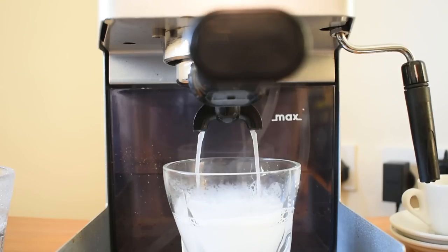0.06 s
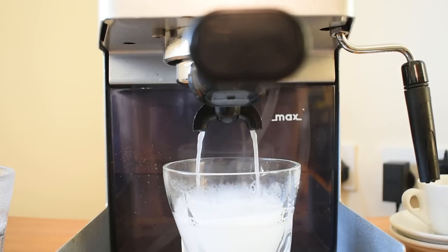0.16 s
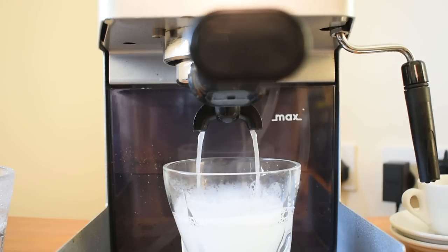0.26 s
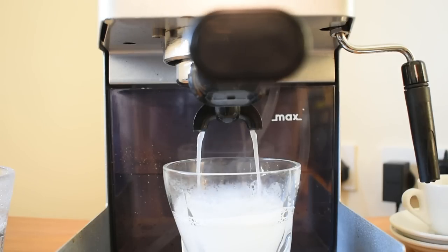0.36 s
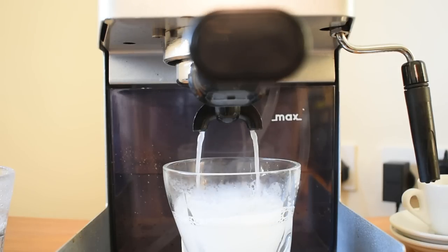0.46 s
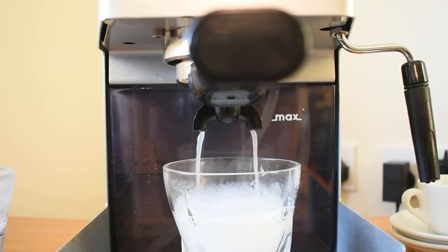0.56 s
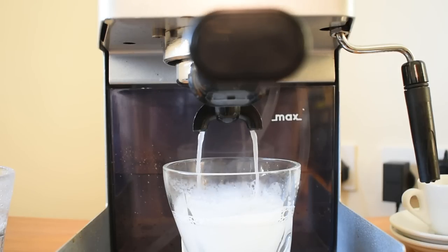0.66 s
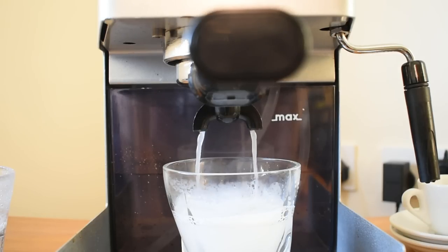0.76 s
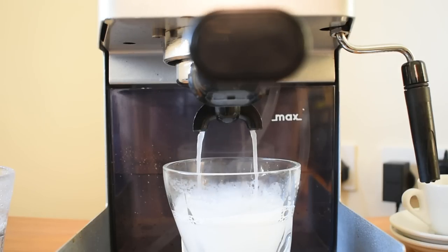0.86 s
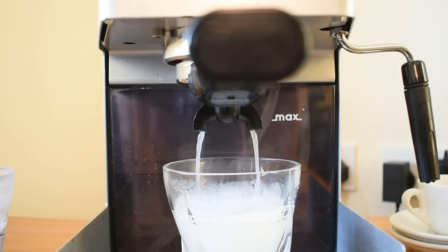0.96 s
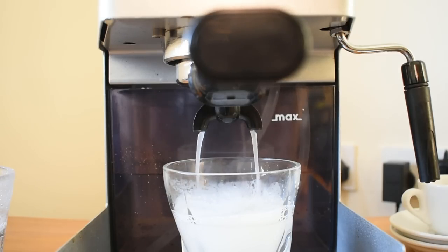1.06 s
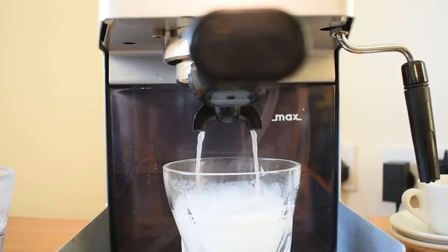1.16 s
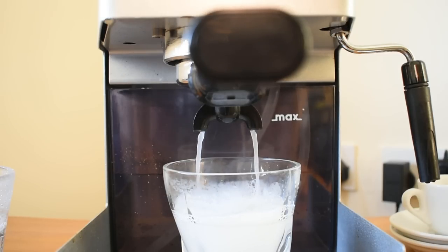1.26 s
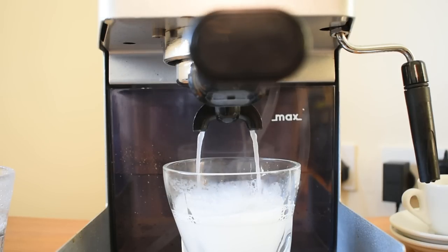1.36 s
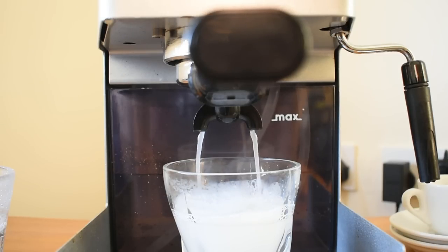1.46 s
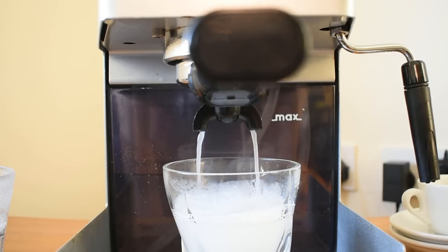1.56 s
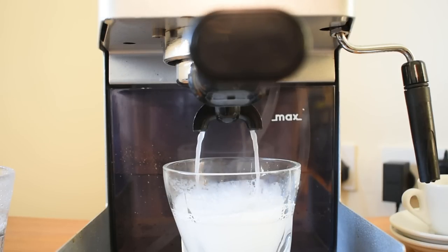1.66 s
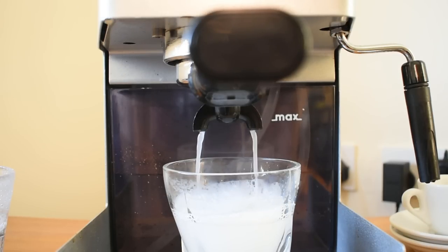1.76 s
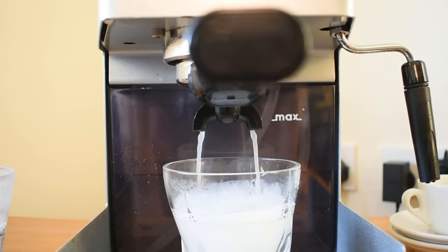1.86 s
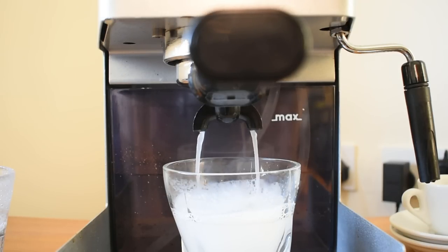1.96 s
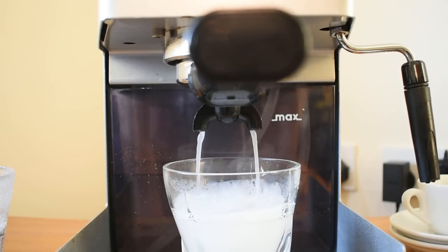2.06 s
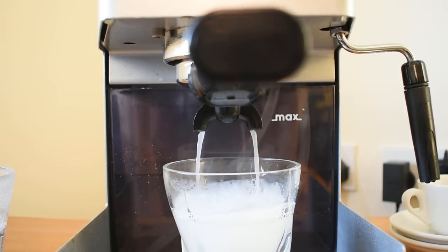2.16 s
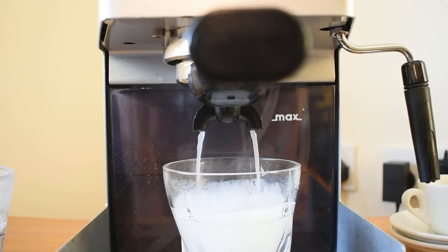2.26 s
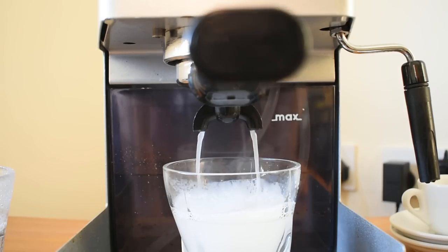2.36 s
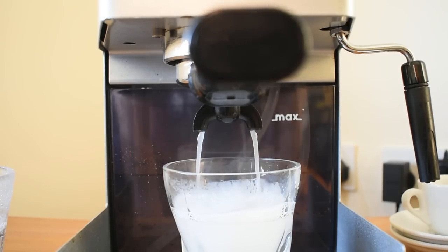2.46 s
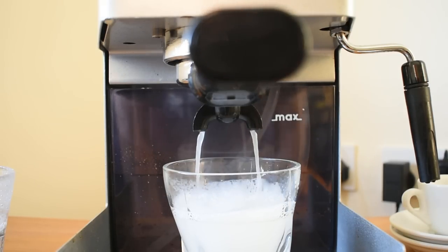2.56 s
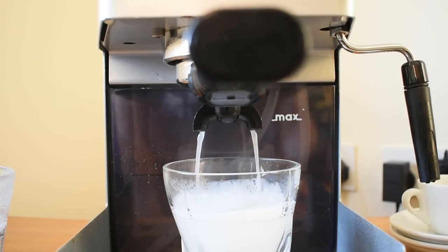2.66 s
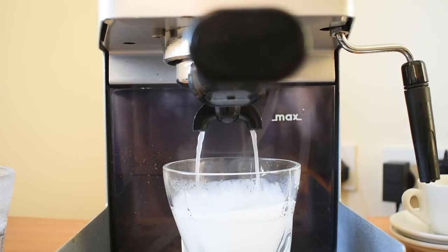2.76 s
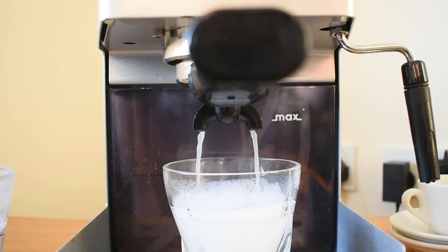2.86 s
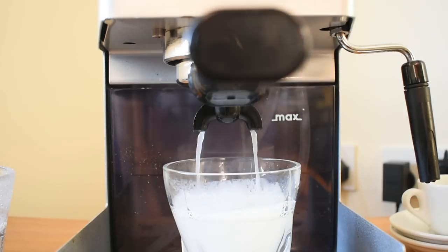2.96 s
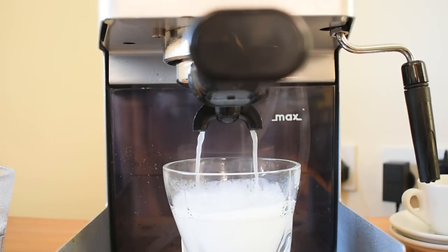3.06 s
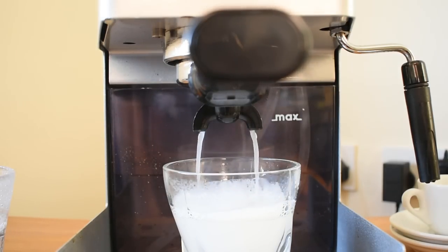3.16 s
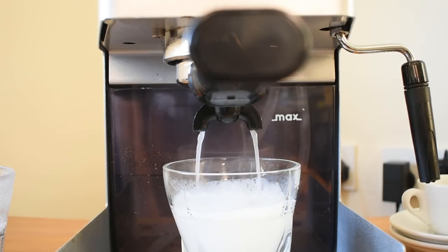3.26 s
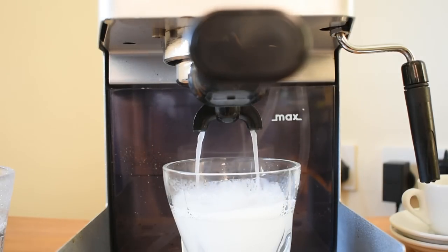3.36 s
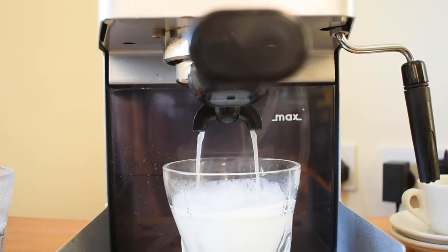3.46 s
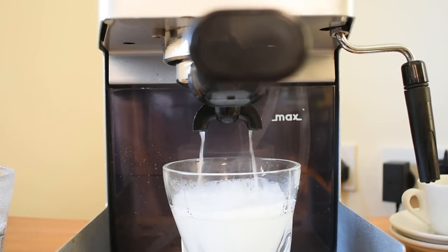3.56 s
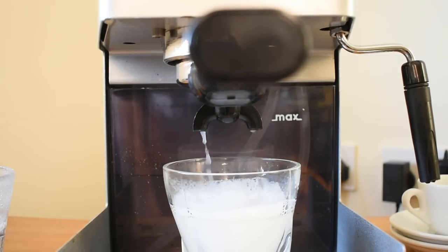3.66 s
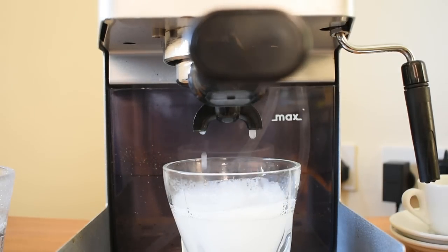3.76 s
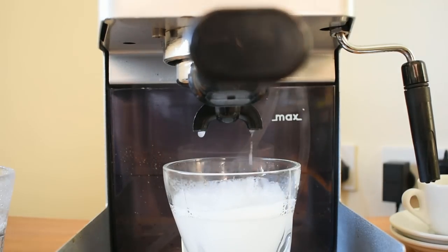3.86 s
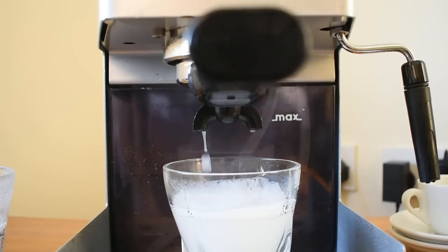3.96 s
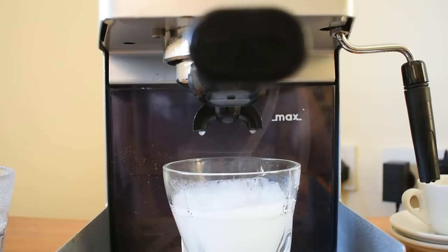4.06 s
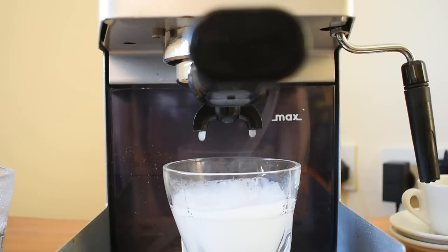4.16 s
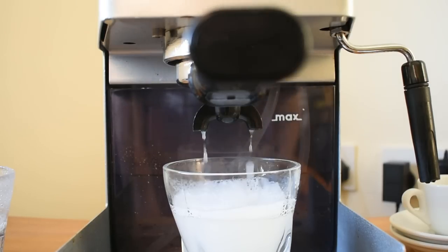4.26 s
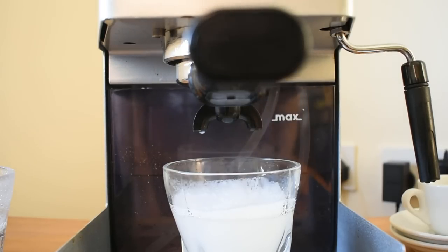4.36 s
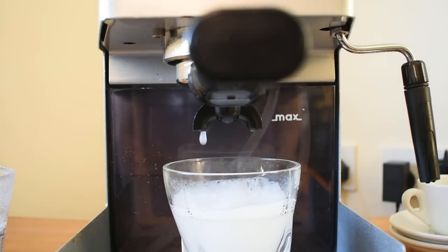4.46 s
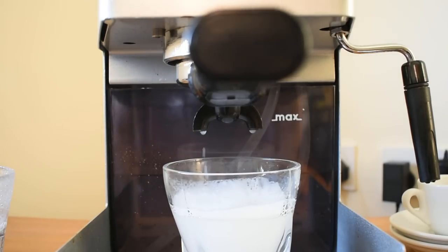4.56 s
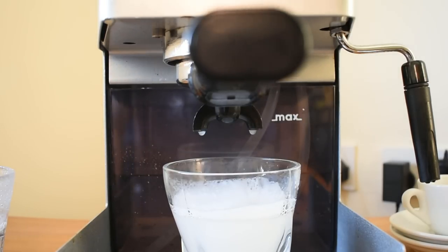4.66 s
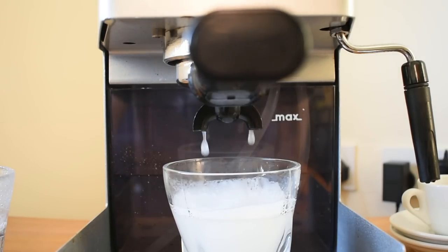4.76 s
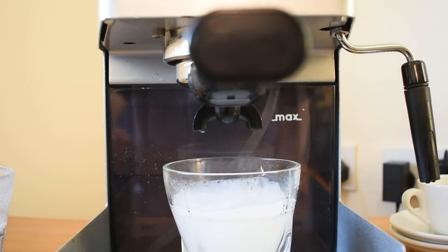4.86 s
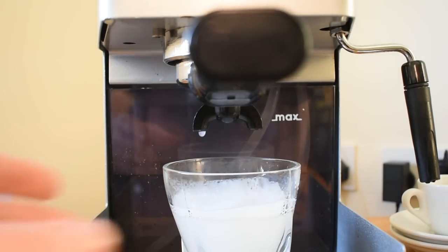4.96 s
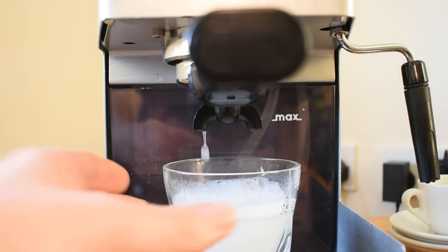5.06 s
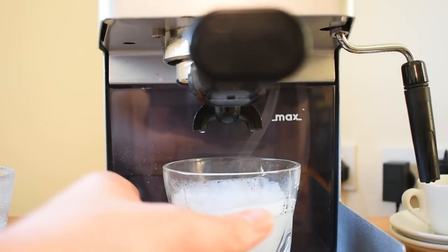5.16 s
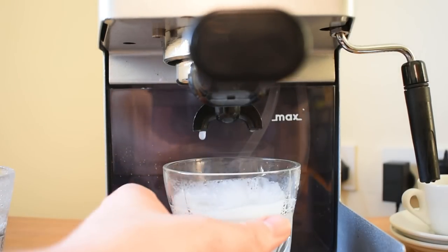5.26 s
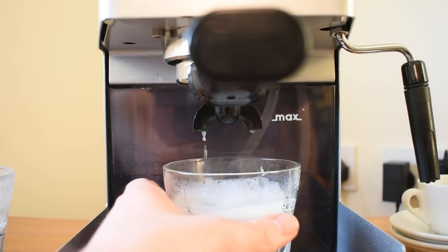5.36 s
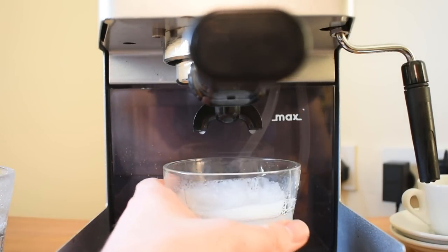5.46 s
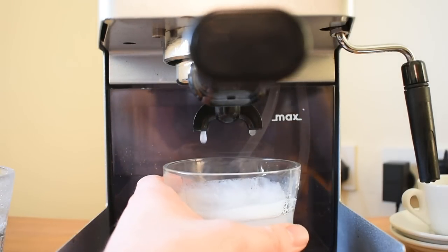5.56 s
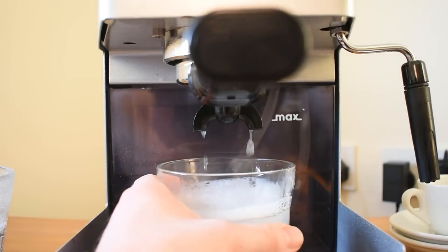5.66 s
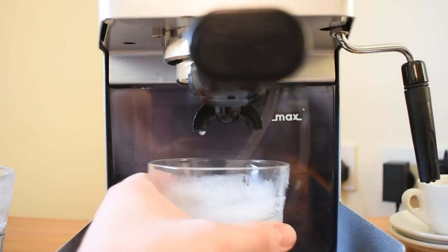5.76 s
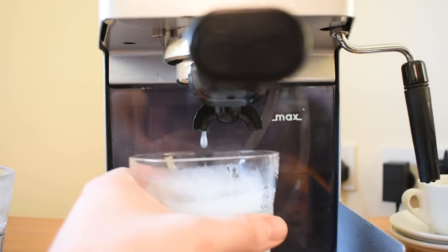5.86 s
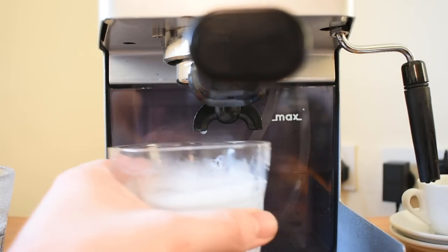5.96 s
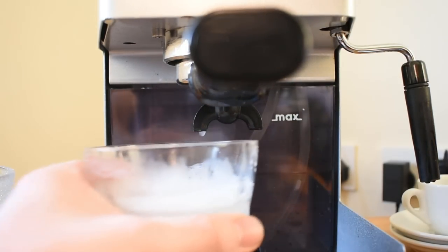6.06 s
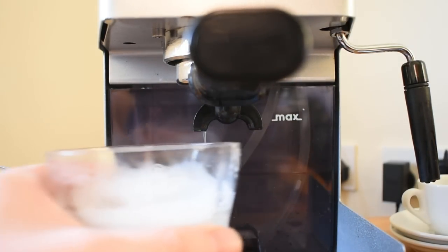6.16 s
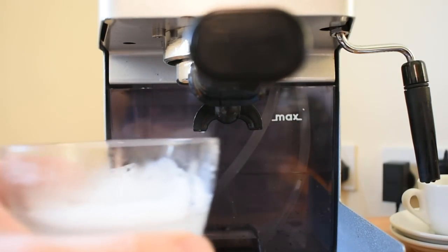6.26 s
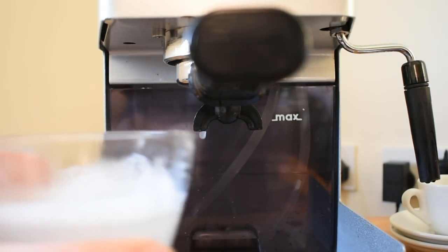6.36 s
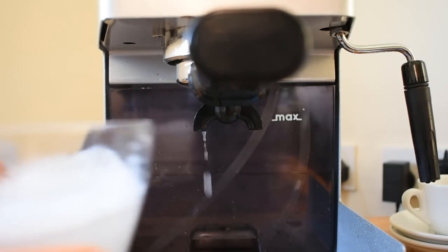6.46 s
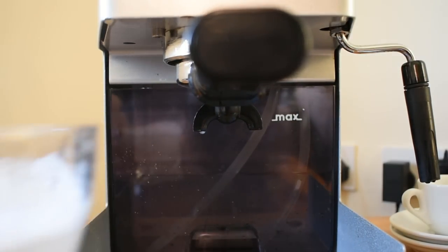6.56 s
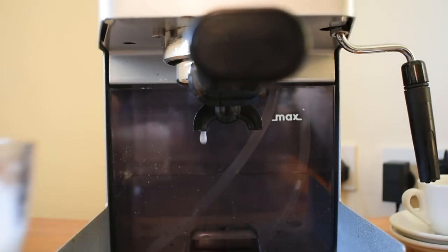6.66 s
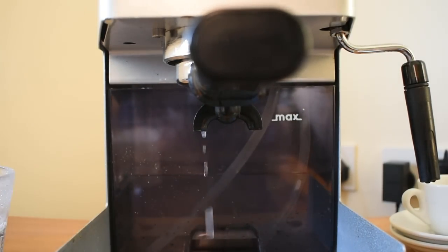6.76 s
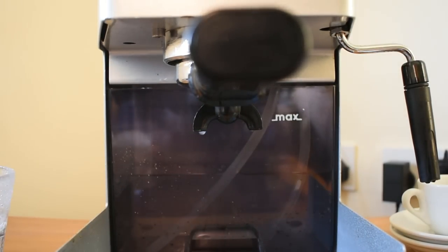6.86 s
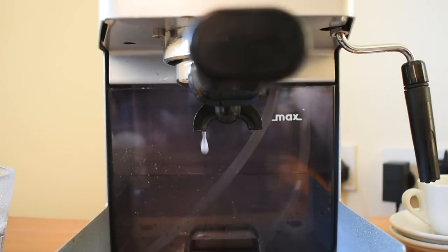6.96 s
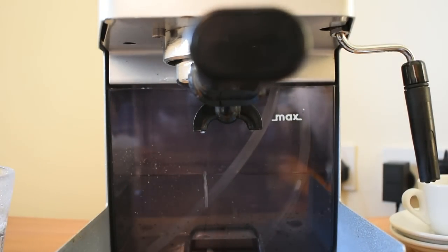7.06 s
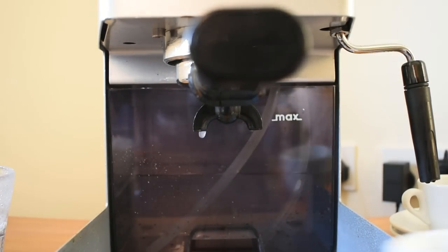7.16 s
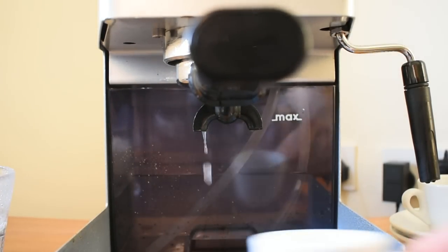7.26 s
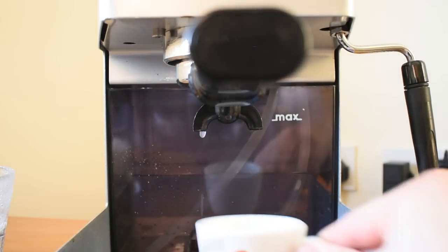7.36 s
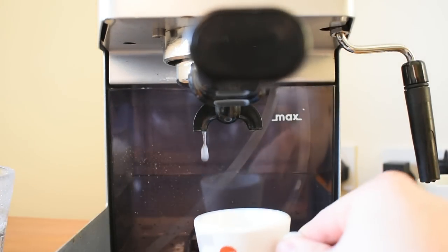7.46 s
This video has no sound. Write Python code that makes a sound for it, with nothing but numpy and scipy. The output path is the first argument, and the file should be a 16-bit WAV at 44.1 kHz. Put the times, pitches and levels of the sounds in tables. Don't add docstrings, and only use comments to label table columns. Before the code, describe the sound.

From 0 to 3.5 s a close espresso machine pump runs steadily: a coarse mains-rate buzz with metallic casing resonances, dense hiss pulsing at every stroke, fine rattling, and a low uneven gurgle of two jets in a tall glass. At about 3.5 s the flow stops and a very loud, bright switch snap cracks in several rapid contacts, slightly overloaded, with panel ringing and a half-second kitchen echo. Then it is quiet: soft room air, faint fridge hum, tiny foam fizz slowly fading. A small brush ticks at 4.5 s. Around 5.5 to 5.8 s the glass tips and drags off the metal tray with dull knocks; faint handling rubs follow at 6.2 to 6.3 s. Near 7.0 s it is set down, chattering quickly to rest with bright scrapes until 7.1 s. At 7.46 to 7.5 s a small cup chinks lightly and slides in.

```python
import sys
import numpy as np
from scipy import signal
from scipy.io import wavfile

SR = 44100
rng = np.random.default_rng(int(sys.argv[2]) if len(sys.argv) > 2 else 0)


def bounce(signal):
    frames = np.transpose(np.atleast_2d(signal))
    limited = np.clip(frames, -1, 1)
    pcm = np.round(limited * 32767).astype(np.int16)
    wavfile.write(sys.argv[1], SR, pcm)


def undo_db(level):
    steps = np.asarray(level, float) / 20
    return 10 ** steps


N = 331191

MAINS_HZ = 49.91
FIRST_STROKE_S, STOP_S = .0130, 3.497
HUM_T60_S, SETTLE_T60_S = 0.4, .32
FLOW_DB, RATTLE_DB, GURGLE_DB, AIR_DB = -31.5, -55, -34.5, -55.2
FOAM_DB, FOAM_FADE_DB_PER_S = -67, 2.2
CHATTER_S, CHATTER_GAP_S, CHATTER_DB, CHATTER_LOSS_DB = 7.0367, .00906, -32.5, 1.9

# order [multiple of mains], level_db [dB rms]
HUM_ORDERS = [(1, -53), (2, -47.5), (3, -48), (4, -39.5), (6, -39), (9, -51), (10, -48), (12, -51),
              (13, -53), (14, -52), (19, -52), (21, -58), (22, -52), (24, -51), (26, -55), (27, -41),
              (29, -48), (31, -58), (41, -60), (50, -59), (51, -60)]
# freq_hz [Hz], level_db [dB rms]
WEAK_ORDERS = [(600, -62), (1500, -66.5), (2500, -63.5), (3500, -64.5), (5300, -66.5)]
# freq_hz [Hz], density_db [dB per Hz]
FLOW_SPECTRUM = [(55, -28.5), (90, -12), (170, -8.5), (500, -10.5), (800, -13), (1500, -16.5),
                 (2500, -16.5), (2750, -19.5), (3300, -16.5), (3500, -17.5), (5500, -15), (9000, -11),
                 (12000, -14), (16000, -18.5)]
# freq_hz [Hz], width_hz [Hz], level_db [dB]
CASING_PEAKS = [(400, 40, 5.6), (613, 31, 7), (723, 30, 6), (954, 60, 8), (1120, 18, 2.4), (1224, 38, 3.8),
                (1372.4, 27, 15.7), (1500, 30, 9.6), (1854, 62, 4.7), (2220, 150, 5), (3750, 60, 5),
                (4880, 87, 2)]
# freq_hz [Hz], width_hz [Hz], level_db [dB]
VALVE_PEAKS = [(3580, 100, -3), (4130, 110, -4.5), (5170, 92, -8), (5740, 82, -3), (6290, 110, -1),
               (7060, 110, -1.5), (7710, 160, -4), (8840, 54, -2.5), (9220, 100, -2.5), (9740, 96, -10.5),
               (10030, 110, -8.5), (13100, 130, -5.5), (13900, 110, -3.5), (14700, 56, -10.5)]
# freq_hz [Hz], width_hz [Hz], level_db [dB]
GLASS_PEAKS = [(291.7, 27, -3.5), (313, 20, -2)]
# start_s [s], level_db [dB], t60_s [s], brightness_db [dB]
SWITCH_CONTACTS = [
    (3.5136, -11, .03, -3),
    (3.5152, -3.5, .016, 1),
    (3.5187, -8, .016, -9),
    (3.5217, -13, .025, -10),
    (3.524, -22, .1, -10),
]
# freq_hz [Hz], density_db [dB per Hz]
SWITCH_SPECTRUM = [(59, -46.5), (100, -17), (357, -10), (801, -12.5), (1280, -1.5), (1550, -7.5),
                   (2740, 5.5), (3320, -9.5), (4380, 0), (8100, -8), (9010, -10.5), (13200, -14.5),
                   (16000, -19.5)]
# freq_hz [Hz], level_db [dB], t60_s [s]
PANEL_MODES = [(160, -10.5, .3), (570, -6, .25), (1039, -2, 0.15), (1327, 1.5, .1), (1884, 7.5, 0.16),
               (2200, 0.5, 0.14), (2640, -3.5, .1), (2780, 0, .17), (4380, -6.5, 0.17)]
# freq_hz [Hz], t60_s [s]
ROOM_T60 = [(150, .5), (400, .46), (1000, .44), (2800, .44), (5000, .42), (8000, .33), (12000, .25)]
# freq_hz [Hz], level_db [dB rms]
FRIDGE_TONES = [(96.9, -72.5), (199.2, -66.5)]
# freq_hz [Hz], density_db [dB per Hz]
AIR_SPECTRUM = [(30, -19), (60, -8), (100, -7.5), (125, -13.5), (165, -10.5), (204, -6), (235, -14),
                (310, -10), (420, -15), (584, -16), (720, -12), (1280, -19.5), (6890, -30.3), (16000, -40)]
# freq_hz [Hz], density_db [dB per Hz]
FOAM_SPECTRUM = [(300, -22), (1000, -8), (3000, -1), (8000, -3), (16000, -11)]
# peak_s [s], level_db [dB], rise_s [s], fall_s [s]
SLEEVE_RUSTLES = [
    (4.492, -55, .07, .07),
    (4.4903, -46, .0004, .004),
    (5.53, -62, .03, .05),
    (5.72, -66, .15, .15),
    (6.17, -65, .03, .1),
    (7.5, -65, .3, .1),
]
# freq_hz [Hz], level_db [dB], t60_s [s]
TRAY_MODES = [(103, -6, 0.13), (298, 5, .09), (388, 3, .045), (520, -6, .04), (750, -10, 0.044),
              (950, -2, .04), (1550, -12, .04), (331, 4.5, .14)]
# freq_hz [Hz], density_db [dB per Hz]
GRIT_SPECTRUM = [(350, -36), (600, -10), (931, -1), (1440, -15), (2430, -12), (3390, -16), (4710, -23.5),
                 (6030, -21.5), (14100, -41), (16000, -45)]
# freq_hz [Hz], width_hz [Hz], level_db [dB]
BASE_PEAKS = [(1550, 86, 6), (2080, 55, 10), (2400, 150, -2), (3050, 150, 1), (4730, 180, 10),
              (5640, 200, 7)]
# start_s [s], level_db [dB]
TRAY_TAPS = [
    (5.548, -42),
    (5.765, -35),
    (6.9695, -34),
    (6.9749, -36),
    (6.990, -34.5),
    (7.4622, -45),
]
# peak_s [s], thud_db [dB], grit_db [dB], fall_s [s]
KNOCK_CONTACTS = [
    (4.4903, -75, -52, .003),
    (5.549, -55, -65, 0.018),
    (6.162, -70, -59.5, .006),
    (6.973, -62, -53, 0.0052),
    (7.022, -50, -49, .012),
    (7.0602, -48, -34, 0.0068),
    (7.462, -60, -56, .003),
]
# peak_s [s], thud_db [dB], grit_db [dB], fall_s [s]
RUB_CONTACTS = [
    (5.525, -65, -62, 0.019),
    (5.765, -57, -46, 0.016),
    (5.80, -56, -71, 0.016),
    (6.228, -62, -57, 0.024),
    (6.335, -70, -60, .022),
    (7.10, -62, -52, .022),
    (7.040, -50, -39, 0.011),
    (7.051, -47, -36, 0.0042),
    (7.509, -60, -47, 0.0092),
]
# centre_s [s], level_db [dB], width_s [s]
HAND_BUMPS = [
    (5.578, -48, .0025),
    (6.215, -45, .002),
    (6.247, -46, .002),
    (6.338, -46, .002),
    (7.068, -41, .002),
]
# freq_hz [Hz], level_db [dB], t60_s [s]
CUP_MODES = [(1230, 1, .06), (1290, -13, .04), (2280, -3, 0.034), (2608, -12, .03), (4930, -4, .02),
             (5300, -14, .04), (11200, -12, .02), (11600, -7, .02)]
# start_s [s], level_db [dB], lowest_mode_db [dB]
CUP_CLINKS = [
    (7.4615, -44, -16),
    (7.476, -51, -16),
    (7.499, -55, 3),
    (7.5025, -51, 6),
    (7.5058, -47, 6),
]


def evened(x):
    return x / np.sqrt(np.mean(x ** 2) + 1e-20)


def read(points, hz):
    f, value = np.transpose(points)
    return np.interp(np.log(hz + 1), np.log(f + 1), value)


def resonance(hz, peaks, lift_db=0.):
    return sum(undo_db(db + lift_db) ** 2 / (1 + (2 * (hz - f) / w) ** 2) for f, w, db in peaks)


def colour(x, spectrum, peaks=(), lift_db=0.):
    hz = abs(np.fft.fftfreq(8192, 1 / SR))
    power = 1 + resonance(hz, peaks, lift_db)
    log_gain = np.log(undo_db(np.maximum(read(spectrum, hz), -100)) * np.sqrt(power))
    taps = np.fft.ifft(np.exp(np.conj(signal.hilbert(log_gain)))).real[:4096]
    return signal.oaconvolve(x, taps / np.linalg.norm(taps))[:len(x)]


def ring(modes, seconds):
    t = np.arange(round(seconds * SR)) / SR
    return sum(undo_db(db - 60 * t / t60) * np.sin(2 * np.pi * hz * t) for hz, db, t60 in modes)


def wander(hz):
    sos = signal.butter(2, hz, fs=SR, output="sos")
    return evened(signal.sosfilt(sos, rng.standard_normal(N)))


def press(t, peak_s, rise_s, fall_s):
    return np.exp(-np.where(t < peak_s, (peak_s - t) / rise_s, (t - peak_s) / fall_s))


def room(x):
    taps = np.zeros(SR // 2)
    at = np.arange(200, len(taps) - 20, 20)
    taps[at + rng.integers(0, 20, len(at))] = rng.choice([-1., 1.], len(at))
    hz, t, z = signal.stft(taps, SR, nperseg=256)
    decay = undo_db(-60 * t / read(ROOM_T60, hz)[:, None])
    tail = signal.istft(z * decay, SR, nperseg=256)[1]
    return signal.oaconvolve(x, tail / np.linalg.norm(tail))[:N]


def kitchen(t):
    air = undo_db(AIR_DB) * evened(colour(rng.standard_normal(N), AIR_SPECTRUM))
    hum = sum(np.sqrt(2) * undo_db(db + 1.5 * wander(5)) * np.sin(2 * np.pi * hz * t) for hz, db in FRIDGE_TONES)
    foam_db = FOAM_DB - FOAM_FADE_DB_PER_S * (t - STOP_S) + 1.0 * wander(15)
    foam = undo_db(foam_db) * (t > STOP_S)
    fibres = evened(undo_db(3 * np.minimum(rng.exponential(1, N), 4) + 2 * wander(60)))
    brush = sum(undo_db(db) * press(t, s, rise, fall) for s, db, rise, fall in SLEEVE_RUSTLES)
    return air + hum + colour((foam + fibres * brush) * rng.standard_normal(N), FOAM_SPECTRUM)


def cup():
    out = np.zeros(N + SR)
    low_hz, low_mode_db, low_t60 = CUP_MODES[0]
    for s, db, low_db in CUP_CLINKS:
        sound = ring([(low_hz, low_mode_db + low_db, low_t60)] + CUP_MODES[1:], .1)
        out[round(s * SR):][:len(sound)] += undo_db(db) * sound
    return out[:N]


def hand_push(t):
    out = np.zeros(N)
    for s, db, width in HAND_BUMPS:
        square = ((t - s) / width) ** 2
        pulse = (square - 1) * np.exp(-.5 * np.minimum(square, 99))
        out += undo_db(db) * pulse * (abs(t - s) < 6 * width)
    return out


def touches(t):
    grains = evened(rng.standard_normal(N) * undo_db(3.6 * np.minimum(rng.exponential(1, N), 4)))
    contacts = [(press(t, s, .001, fall), low, high) for s, low, high, fall in KNOCK_CONTACTS]
    contacts += [(press(t, s, fall, fall), low, high) for s, low, high, fall in RUB_CONTACTS]
    thud = sum(undo_db(db) * force for force, db, _ in contacts)
    grit = sum(undo_db(db) * force for force, _, db in contacts)
    tray, blows = ring(TRAY_MODES, .25), np.zeros(N)
    chatter = [(CHATTER_S + k * CHATTER_GAP_S, CHATTER_DB - k * CHATTER_LOSS_DB) for k in range(10)]
    for s, db in TRAY_TAPS + chatter:
        blows[round(s * SR)] = undo_db(db)
    drive = undo_db(9.0) * thud * grains / np.linalg.norm(tray) + blows / abs(tray).max()
    highpass = signal.butter(2, 85, "high", fs=SR, output="sos")
    thump = signal.sosfilt(highpass, signal.oaconvolve(drive, tray)[:N])
    return thump + hand_push(t) + colour(grit * grains, GRIT_SPECTRUM, BASE_PEAKS)


def switch(t):
    grain = rng.standard_normal(N)
    decays = [undo_db(db - 60 * np.maximum(t - s, 0) / t60) * (t >= s) for s, db, t60, _ in SWITCH_CONTACTS]
    force = sum(decays) * grain
    bright = sum(undo_db(row[3]) * decay for row, decay in zip(SWITCH_CONTACTS, decays))
    edge = bright * rng.standard_normal(N)
    crack = colour(edge, [(4000, -30.5), (9000, 0.0), (14000, -1.5), (16000, -8.0)])
    panel = ring(PANEL_MODES, .4)
    panel_ring = signal.oaconvolve(force, panel / np.linalg.norm(panel))[:N]
    return colour(force, SWITCH_SPECTRUM) + undo_db(-6.5) * crack + undo_db(-11.5) * panel_ring


def gurgle(t):
    settle = undo_db(-60 * np.maximum(t - STOP_S, 0) / SETTLE_T60_S)
    drive = rng.standard_normal(N) * undo_db(1.0 * wander(12)) * settle
    column = colour(drive, [(20, -46.0), (200, -43.5), (450, -35.0), (20000, -91)], GLASS_PEAKS, lift_db=35.0)
    return undo_db(GURGLE_DB) * column / np.std(column[:round(STOP_S * SR)])


def pump_flow(t):
    since_s = (t - FIRST_STROKE_S) % (1 / MAINS_HZ)
    surge = .3 + (since_s / .007) ** 1.6 * np.exp(-1.6 * (since_s / 0.0062 - 1))
    surge = surge * undo_db(.8 * wander(18))
    low, high = rng.standard_normal((2, N))
    split = signal.butter(2, 1700, fs=SR, output="sos")
    body = colour(signal.sosfilt(split, low), FLOW_SPECTRUM, CASING_PEAKS)
    hiss = evened(surge) * high
    hiss = colour(hiss - signal.sosfilt(split, hiss), FLOW_SPECTRUM, CASING_PEAKS)
    spray = evened(surge ** 2.0) * rng.standard_normal(N)
    hiss = hiss + undo_db(-8) * colour(spray, [(7000, -30.0), (12000, -0.5), (16000, 2.5)])
    hiss = colour(hiss, [(20, 0.0019), (20000, 0)], VALVE_PEAKS, lift_db=8.5)
    strokes = np.diff(since_s, prepend=0) < 0
    clatter = rng.standard_normal(600) * np.exp(-np.arange(600) / 220.)
    rattle = signal.oaconvolve(1. * strokes, clatter)[:N]
    rattle = colour(rattle, [(2300, -37.5), (3300, 1.5), (5000, -3.5), (7000, -25.5)])
    return (t < STOP_S) * (undo_db(FLOW_DB) * evened(body + hiss) + undo_db(RATTLE_DB) * evened(rattle))


def pump_hum(t):
    sway, out, levels_db = wander(3.5), np.zeros(N), dict(HUM_ORDERS)
    until = t < STOP_S + 2 * HUM_T60_S
    for order in range(13, 106):
        hz = order * MAINS_HZ
        lift = resonance(hz, CASING_PEAKS) + resonance(hz, VALVE_PEAKS, 8.0)
        levels_db.setdefault(order, read(WEAK_ORDERS, hz) + 10 * np.log10(lift))
    for order, db in levels_db.items():
        phase = 2 * np.pi * rng.random() + 0.0056 * order * sway[until]
        t60_s = HUM_T60_S * min(order / 4, 1)
        ring_out = undo_db(-60 * np.maximum(t[until] - STOP_S, 0) / t60_s)
        tone = np.cos(2 * np.pi * order * MAINS_HZ * t[until] + phase)
        out[until] += np.sqrt(2) * undo_db(db) * ring_out * tone
    return out


def scene():
    t = np.arange(N) / SR
    flow, snap, hands = pump_flow(t), switch(t), touches(t) + cup()
    walls = room(undo_db(-9.0) * flow + undo_db(-11.5) * snap + undo_db(-16) * hands)
    return (pump_hum(t) + flow + gurgle(t) + snap + hands + walls + kitchen(t))[None]


def band_limit(x):
    return signal.sosfilt(signal.butter(12, 16130, fs=SR, output="sos"), x)


def record(dry):
    thin = signal.sosfilt(signal.butter(4, 36, "high", fs=SR, output="sos"), dry)
    lowpass = signal.firwin(2001, 15740, window=("kaiser", 9), fs=SR)
    limited = np.clip(signal.oaconvolve(thin, lowpass[None], "same"), -1, 1)
    return band_limit(limited)


dry = scene()
out = record(dry)
bounce(out)
```